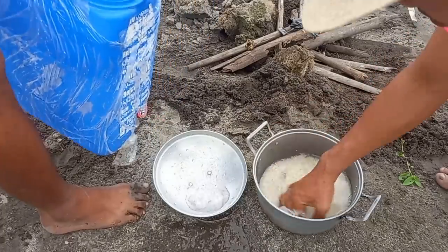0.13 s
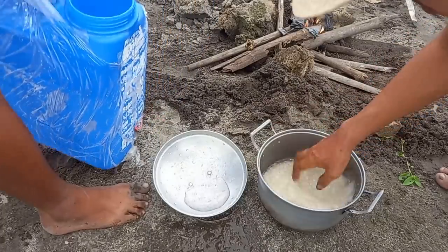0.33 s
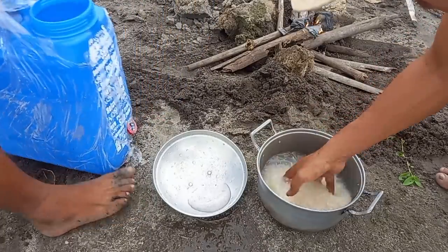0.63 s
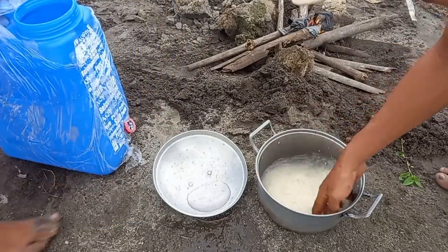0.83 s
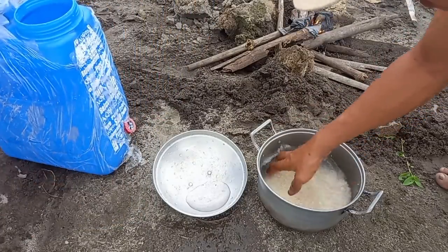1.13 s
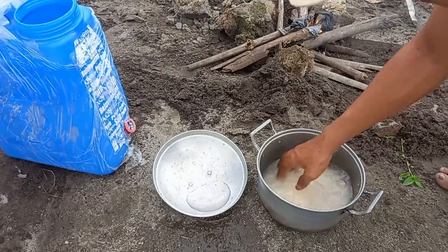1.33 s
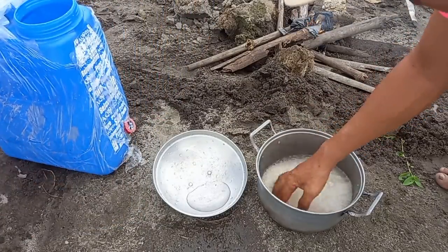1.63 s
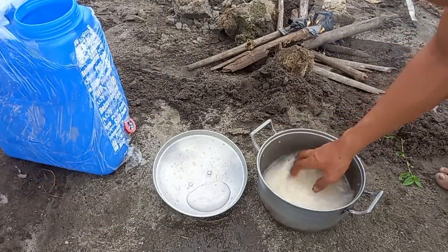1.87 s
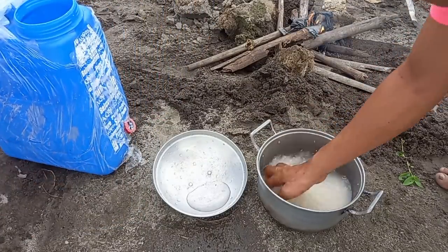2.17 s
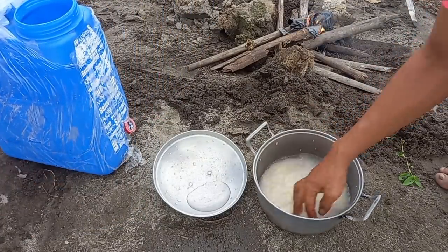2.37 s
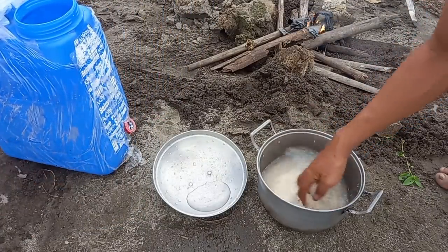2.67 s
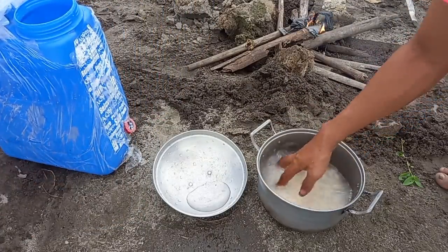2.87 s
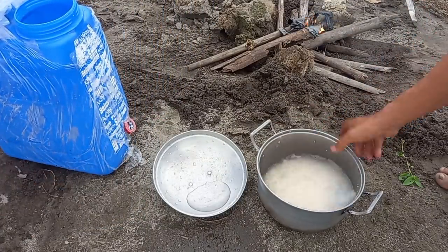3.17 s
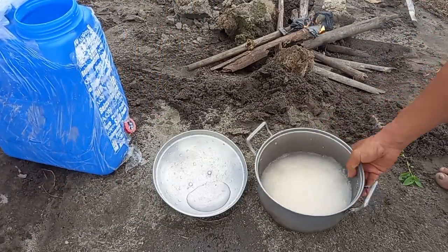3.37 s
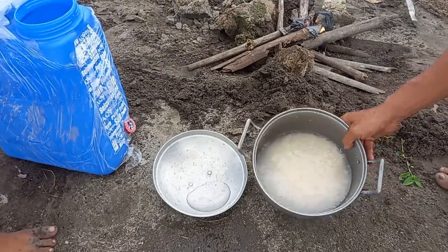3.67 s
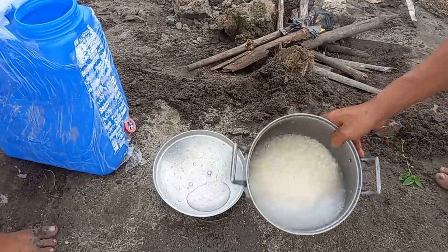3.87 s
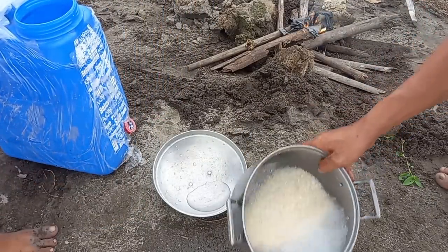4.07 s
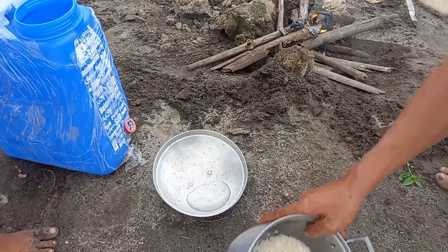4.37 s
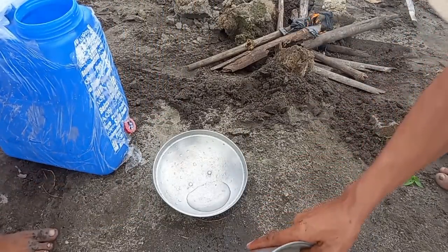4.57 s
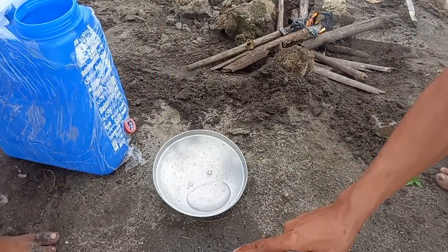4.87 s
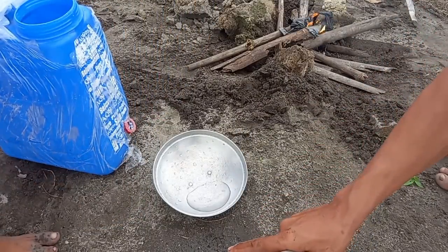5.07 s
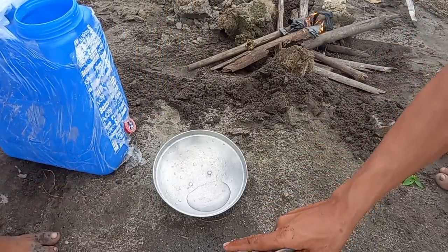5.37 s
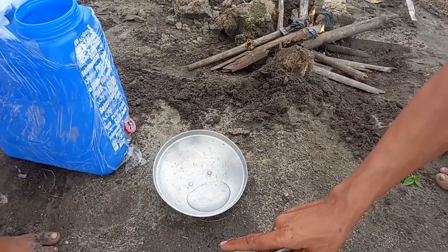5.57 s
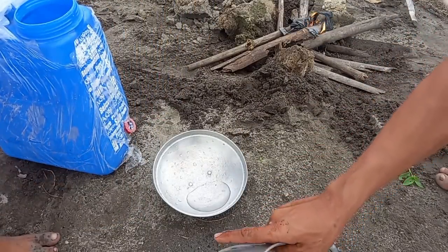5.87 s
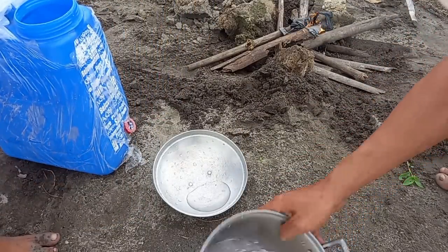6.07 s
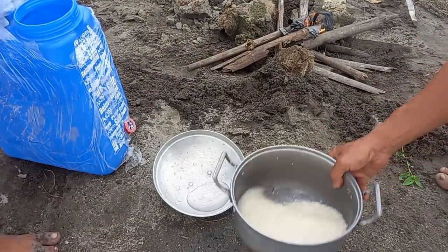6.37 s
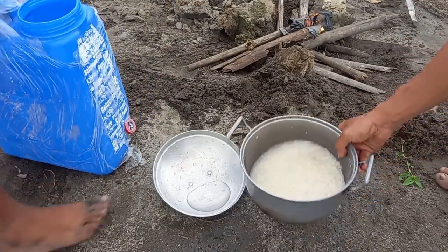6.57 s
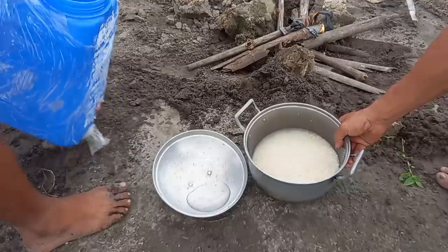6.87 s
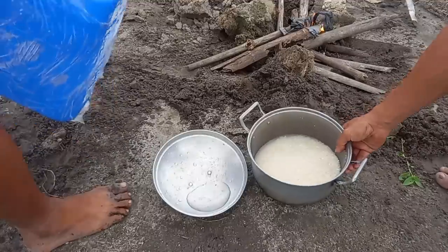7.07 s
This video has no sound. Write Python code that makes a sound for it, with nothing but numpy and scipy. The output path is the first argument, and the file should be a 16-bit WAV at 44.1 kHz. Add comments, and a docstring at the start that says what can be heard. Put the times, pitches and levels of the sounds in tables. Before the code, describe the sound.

Wet rice rasps and swishes under a stirring hand in a metal pot, the handle clacks, water splatters on the ground, then rice slides back.

```python
"""Outdoors, close to an aluminium pot: a hand swirls raw rice in water, then tips the pot by its loose handle.
Rice and falling water are showers of short noise ticks; splashes are swarms of ringing bubbles over noise.
Water spills on the ground, then the wet rice slides back; the handle clacks and dull knocks come in between.
Behind it a low noise throbs, with a faint, high, fast-pulsing tone.
The two microphone ports lie a few centimetres apart, so sounds reach them at slightly different times."""
import sys
import numpy as np
from scipy import signal
from scipy.io import wavfile
from scipy.ndimage import uniform_filter1d

SR = 44100
rng = np.random.default_rng(int(sys.argv[2]) if len(sys.argv) > 2 else 0)


def transcribe(signal):
    """Save signal, clipped to [-1, 1], as a 16-bit WAV file at the path in sys.argv[1]."""
    frames = np.atleast_2d(signal).T
    limited = np.clip(frames, -1, 1)
    pcm = np.round(limited * 32767).astype(np.int16)
    wavfile.write(sys.argv[1], SR, pcm)


N = 317690
TIME = np.arange(N) / SR
EDGE_HZ = 15800  # top of the band, and of the grain pitches
# Colour of water splashing inside the pot: (frequency [Hz], relative level per Hz [dB])
POT_SPLASH_COLOUR = [(400, -17), (1200, -7.5), (3000, -6.5), (9000, -26.5)]


def amp(db):
    """Decibels to a linear gain."""
    return 10 ** (np.asarray(db) / 20)


def unit(x):
    """Scales a sound to an RMS of one."""
    return x / np.sqrt(np.mean(x ** 2) + 1e-20)


def pan(db):
    """Gains of the two ports for a left minus right difference."""
    return amp(np.array([[db], [-db]]) / 2)


def together(gains):
    """Unrelated sounds add in power."""
    return np.sqrt(np.sum(np.square(gains), axis=0))


def add(mix, start_s, sound):
    """Lays a sound into the mix at its start time, cut off at the end."""
    part = mix[:, round(start_s * SR):][:, :sound.shape[1]]
    part += sound[:, :part.shape[1]]


def swell(start, rise, length, fall):
    """The gain of one movement: it builds up and, once its length is over, dies away; all in seconds."""
    age = np.maximum(TIME - start, 0)
    return (1 - np.exp(-age / rise)) * np.exp(-np.maximum(age - length, 0) / fall)


def wander(per_s):
    """Random values, per_s of them a second, joined by straight lines."""
    knots = rng.standard_normal(4000)
    return np.interp(TIME * per_s, np.arange(len(knots)), knots)


def colour(x, points):
    """Causal minimum-phase filter with the given spectrum, so that clicks keep their sharp fronts."""
    points_hz, points_db = np.transpose(points)
    hz = np.abs(np.fft.fftfreq(4096, 1 / SR))
    log_gain = np.log(amp(np.interp(np.log(hz + 1), np.log(points_hz), points_db)))
    response = np.exp(np.conj(signal.hilbert(log_gain)))
    taps = np.fft.ifft(response).real[:len(hz) // 2]
    return signal.oaconvolve(x, taps[None] / np.linalg.norm(taps), axes=1)[:, :x.shape[1]]


def ports(x, lag, wet):
    """Sound reaches the left port lag samples late (right if negative); the pot walls add short scattered echoes."""
    t = np.arange(0, .012, 1 / SR)
    echoes = rng.standard_normal((2, len(t))) * np.exp(-t / .004)
    paths = wet * echoes / np.linalg.norm(echoes, axis=1, keepdims=True)
    paths[0, max(round(lag), 0)] += 1
    paths[1, max(-round(lag), 0)] += 1
    return signal.fftconvolve(x[None], paths, axes=1) / np.sqrt(1 + wet ** 2)


def shower(shapes, drive, per_s, spread_db):
    """Plays the shapes at random moments while the drive lasts, their sizes spread exponentially in dB."""
    when, which, chance = rng.random((60000, 3))[:int(per_s * N / SR)].T
    size = amp(spread_db * np.minimum(-np.log(1 - chance), 4))
    moving = drive[(when * N).astype(int)] > drive.max() / 100
    out = np.zeros((2, N))
    for s, k, gain in zip(when[moving] * N / SR, which[moving] * len(shapes), size[moving]):
        add(out, s, gain * shapes[int(k)])
    # level set as if the shower never paused
    power = np.sum(size ** 2) * np.mean(np.square(shapes)) * shapes[0].shape[1] / N
    return out / np.sqrt(power)


def grain(hz, fall):
    """A tiny wet tick: a narrow burst of noise that swells and dies within milliseconds."""
    t = np.arange(0, .008, 1 / SR)
    noise = signal.lfilter(*signal.iirpeak(hz, 4.0, fs=SR), rng.standard_normal(len(t)))
    return unit(noise * t * np.exp(-t / fall))


def patter(drive, spectrum, per_s, spread_db, fall, hiss, clump_db, lag, wet, pan_db, count=120):
    """Wet grains or drops tick in clumps over the fine hiss of the moving mass; the pot scatters the wet share."""
    pitches = np.linspace(1500, EDGE_HZ, count)
    shapes = [ports(grain(hz, fall), lag + rng.normal() / 2, wet) for hz in pitches]
    direct = ports(rng.standard_normal(N), lag, 0)[:, :N]
    fine = unit(direct + 2 * wet * rng.standard_normal((2, N)))
    ticks = shower(shapes, drive, per_s, spread_db) + hiss * fine
    clumps = unit(amp(clump_db * wander(60)))
    return pan(pan_db) * drive * clumps * colour(ticks, spectrum) / np.hypot(1, hiss)


def bubble(hz, cycles, rise):
    """A ringing air pocket whose pitch glides as its depth changes."""
    age = np.arange(3000) / SR * hz / cycles  # in decay times
    turns = cycles * (age + rise * age * (age / 2 - .7))
    return (1 - np.exp(-age * 7)) * np.exp(-age) * np.sin(2 * np.pi * turns)


def froth(drive, low_hz, high_hz, per_s, spread_db, cycles, lag, count=48):
    """A swarm of bubbles of many sizes, each size with its own glide."""
    shapes = []
    for hz in np.geomspace(low_hz, high_hz, count):
        rise = 0.035 * rng.uniform(-1.2, 1.94)
        shapes.append(ports(unit(bubble(hz, cycles, rise)), lag, 1.0))
    return shower(shapes, drive, per_s, spread_db)


def splash(drive, spectrum, low_hz, high_hz, breaking_db, per_s, spread_db, cycles, wash, lag):
    """Gently moved water only swishes; as it is driven harder the surface breaks and bubbles take over."""
    broken = drive / (drive + amp(breaking_db))
    bubbles = broken * froth(drive, low_hz, high_hz, per_s, spread_db, cycles, lag)
    swish = wash * rng.standard_normal((2, N))
    return drive * colour(bubbles + swish, spectrum) / np.hypot(broken, wash)


def rumble():
    """A low noise that throbs about ten times a second, like a far idling engine."""
    # Throb rate: (time [s], rate [per second])
    throb_rates = [(0, 10.5), (4.8, 10.5), (5, 11.1), (6, 10.9), (6.4, 10.1)]
    # Rumble colour: (frequency [Hz], relative level per Hz [dB])
    rumble_colour = [(33, -46), (50, -19), (70, -2.5), (97, 3.5), (175, -9), (235, -11.5), (330, -20),
                     (900, -46)]
    turns = np.cumsum(np.interp(TIME, *np.transpose(throb_rates))) / SR + .45
    throb = amp(2.3 * np.cos(2 * np.pi * turns) + np.cos(4 * np.pi * turns))
    # one noise common to both ports, and a weaker one for each
    source = rng.standard_normal(N) + 0.5 * rng.standard_normal((2, N))
    noise = unit(colour(source, rumble_colour))
    steady = noise / np.sqrt(uniform_filter1d((noise ** 2).mean(0), size=6000))
    return amp(-21.5) * unit(steady * throb) * pan(db=-0.5)


def high_tone():
    """A faint, high, fast-pulsing tone of uneven strength that holds and then fades away."""
    pitch_hz, pulses_per_s = 8490, 21.14
    level_db, steady_s, fade_s = -45, 4.9, 1.4
    pulses = np.sin(np.pi * pulses_per_s * TIME) ** 4
    tone = np.sin(2 * np.pi * np.cumsum(pitch_hz + 60 * wander(600)) / SR)
    fade = np.exp(-np.maximum(TIME - steady_s, 0) / fade_s)
    return amp(level_db + 2 * wander(22)) * fade * pulses * tone


def dips():
    """The gain of rumble and high tone, which now and then drops and recovers."""
    # Dips: (time [s], depth [dB], hold [s], recovery time [s])
    dip_list = [(0.0, 9.5, 0.51, 0.41), (1.516, 10.5, 0.05, 0.68), (3.31, 2.5, 0.23, 0.051),
                (3.499, 14.5, 0.035, 0.41), (5.965, 3.5, 0.37, 0.044), (6.24, 8.5, .05, 0.78)]
    onset_s = 0.022
    return amp(-sum(depth_db * swell(s, onset_s, hold, recovery) for s, depth_db, hold, recovery in dip_list))


def air():
    """The faint outdoor hiss: noise that is mostly separate at the two ports and flutters slightly."""
    # Hiss colour: (frequency [Hz], relative level per Hz [dB])
    air_colour = [(500, 4), (1000, -3.5), (2000, -6), (3200, -4.5), (5500, -11.5), (11500, -16.5),
                  (15000, -9.5)]
    noise = 0.33 * rng.standard_normal(N) + rng.standard_normal((2, N))
    return amp(-39.0) * unit(colour(noise, air_colour) * amp(0.35 * wander(25)))


def knocks():
    """Dull knocks and bumps: one heavily damped swing and a dry tick."""
    # Knocks: (time [s], swing level [dB], pitch [Hz], swell time [s], fall time [s],
    # level of the dry tick [dB], left minus right of the swing [dB])
    knock_list = [(3.970, 2, 1680, 0.000041, 0.00031, -23.5, 2.5),
                  (3.9741, -6.5, 2000, 0.00014, 0.00031, -28, 7), (4.2906, -2.5, 227, 0.0016, 0.01, -21, 2),
                  (0.64, -17.5, 130, 0.011, 0.042, -60, 0), (4.923, -3, 87.4, 0.015, 0.017, -60, -19.5)]
    out, t = np.zeros((2, N)), np.arange(9000) / SR
    for s, db, hz, rise, fall, tick_db, pan_db in knock_list:
        envelope = (1 - np.exp(-t / rise)) ** 2 * np.exp(-np.maximum(t - rise, 0) / fall)
        swing = -np.sin(2 * np.pi * hz * t) * envelope
        tick = ports(rng.standard_normal(len(t)) * np.exp(-t / 0.011), 0, 0.68)
        add(out, s, amp(db) * pan(pan_db) * swing)
        add(out, s, amp(tick_db) * colour(tick, [(450, 2.5), (2300, -4), (10000, -21.0)]))
    return out


def handle():
    """The loose handle scrapes in its lugs and stops; the wet load damps the metal at once."""
    # Clacks: (time [s], level [dB], length of the scrape [s], fall time [s],
    # lag of the left port [samples], brightness [dB per octave])
    clacks = [(3.311, -11, 0.0008, 0.0017, 1, 7), (3.5, -13.5, 0.0023, 0.0082, 1, 1.5),
              (3.538, -4.5, 0.00086, 0.0024, 4, 2), (6.25, -6, 0.0091, 0.00093, 2, 0),
              (6.2742, -6, 0.001, 0.0011, -0.5, 1.5), (7.091, -8.5, 0.0019, 0.0018, -2, -0.5)]
    # Colour of the metal before the brightness tilt: (frequency [Hz], relative level per Hz [dB])
    metal_colour = [(150, -19), (450, 0.5), (900, -6), (1500, -2), (3000, 0), (5200, -0.5), (7200, -1),
                    (9500, -9.5), (15000, -8.5)]
    out, t = np.zeros((2, N)), np.arange(4000) / SR
    for s, db, scrape, fall, lag, tilt_db in clacks:
        envelope = np.sqrt(np.minimum(t / scrape, 1)) * np.exp(-np.maximum(t - scrape, 0) / fall)
        chatter = rng.standard_normal(len(t)) * envelope
        metal = [(hz, band_db + tilt_db * np.log2(hz)) for hz, band_db in metal_colour]
        add(out, s, amp(db) * colour(ports(chatter, lag, 0.93), metal))
    return out


def smacks():
    """Wet smacks and drips: a film of water snaps in a very short, broad burst."""
    # Smacks: (time [s], level [dB], centre frequency [Hz])
    smack_list = [(0.146, -7, 10500), (0.325, -7, 2000), (0.954, -5.5, 2300), (1.479, -8.5, 4100),
                  (1.508, -3.5, 7200), (1.522, -4, 4500), (1.552, -7, 3020), (2.483, -10, 1700),
                  (3.12, -12, 2900), (3.681, -13.5, 3400), (4.154, -11.5, 13200), (5.142, -7.5, 5900),
                  (5.719, -4.5, 11700), (6.106, -7, 1600)]
    out, t = np.zeros((2, N)), np.arange(2000) / SR
    for s, db, hz in smack_list:
        snap = rng.standard_normal(len(t)) * np.sqrt(t / 0.00028) * np.exp(-t / 0.00046)
        burst = ports(snap, 2, 0.98)
        add(out, s, amp(db) * colour(burst, [(hz / 8, -24), (hz, 0), (hz * 2.4, -12)]))
    return out


def plops():
    """Each single bubble glides upward by its own share as it surfaces, in a short splash of the water that traps it."""
    # Air pockets that close behind the fingers or under falling drops: (time [s], pitch [Hz], level [dB])
    bubbles = [(.145, 2270, -16), (0.259, 1620, -14), (.298, 1500, -15), (0.325, 1304, -16.5),
               (0.329, 2570, -13.5), (.537, 1110, -15.5), (0.538, 1800, -15.5), (0.6, 1334, -20),
               (0.654, 1455, -17.5), (.705, 780, -18), (0.713, 2980, -13), (0.73, 1154, -12.5),
               (.817, 3300, -13), (1.1, 669, -19), (1.114, 1303, -13), (1.353, 2280, -18.5),
               (1.48, 4100, -11), (1.533, 1323, -11.5), (1.668, 1580, -21), (2.012, 2410, -11),
               (2.202, 1360, -13.5), (2.205, 2460, -10.5), (2.255, 2260, -10.5), (2.274, 1560, -7.5),
               (2.336, 1866, -21), (2.482, 2800, -16.5), (2.691, 1176, -12.5), (2.702, 1680, -9),
               (2.815, 1230, -21.5), (4.769, 6670, -4), (5.95, 3100, -9.5), (6.146, 3130, -15.5)]
    splash_s, splash_db = 0.0093, -12.5  # level relative to the bubble
    out, t = np.zeros((2, N)), np.arange(3000) / SR
    age = t / splash_s
    for s, hz, db in bubbles:
        ring = bubble(hz, cycles=8, rise=rng.uniform(0, 0.06))
        add(out, s, amp(db) * ports(ring, 2, 0.59))
        spray = unit(signal.lfilter(*signal.iirpeak(hz, 2, fs=SR), rng.standard_normal((2, len(t)))))
        add(out, s, amp(db + splash_db) * spray * np.sqrt(age) * np.exp(-age))
    return out


def gurgles():
    """Churning water keeps an air cavity ringing; its pitch glides, mostly down, as the water reshapes it."""
    # Gurgles: (time [s], length [s], first pitch [Hz], last pitch [Hz], level [dB])
    gurgle_list = [(0.561, 0.039, 1450, 844, -29.5), (0.628, 0.29, 666, 571, -36),
                   (0.675, 0.13, 1068, 1020, -39), (1.709, 0.047, 1278, 967, -33),
                   (2.982, 0.3, 402.2, 300, -37.5), (5.754, 0.052, 498, 545, -33.5),
                   (6.019, 0.15, 1252, 1152, -38.5)]
    width_hz = 45
    out = np.zeros((2, N))
    for s, length, first_hz, last_hz, db in gurgle_list:
        u = np.linspace(0, 1, round(length * SR))
        noise = [1, 1j] @ rng.standard_normal((2, SR))
        churn = signal.lfilter([1], [1, -np.exp(-np.pi * width_hz / SR)], noise)[-len(u):]
        turns = np.cumsum(first_hz + (last_hz - first_hz) * u) / SR
        ring = (churn * np.exp(2j * np.pi * turns)).real
        add(out, s, amp(db) * ports(unit(ring * np.sin(np.pi * np.sqrt(u))), 2, 0.51))
    return out


def slosh():
    """Water surges against the wall, and each surge folds large, dull air pockets into it."""
    # Surges: (time of the crest [s], level [dB], half length [s])
    surges = [(0.673, -42, 0.033), (0.813, -47, 0.065), (2.76, -49, 0.15), (3.09, -47.5, 0.13),
              (6.111, -36, 0.0059), (6.772, -38, 0.032)]
    # Slosh colour: (frequency [Hz], relative level per Hz [dB])
    slosh_colour = [(170, 6), (330, 2.5), (620, 4), (1000, -4), (3500, -29)]
    surge = sum(amp(db) * np.exp(-((TIME - s) / half) ** 2 / 2) for s, db, half in surges)
    pockets = froth(surge, 180.0, 1404, per_s=2500, spread_db=0.82, cycles=2.55, lag=0)
    return surge * colour(pockets, slosh_colour)


def pouring():
    """Rinse water patters and splashes on the ground: two gushes over the rim, then a stream that swells and stops."""
    # Gushes: (start [s], rise time [s], length [s], patter level [dB])
    gushes = [(4.524, 0.014, 0.026, -31), (4.641, 0.083, 0.15, -25.5)]
    # Stream: (time [s], patter level [dB])
    stream_levels = [(4.9, -39.5), (5.104, -37.5), (5.47, -40), (5.582, -33), (5.9, -30), (5.96, -25),
                     (6.24, -27.5)]
    # Colours of the patter and the splash on the ground: (frequency [Hz], relative level per Hz [dB])
    draining_colour = [(700, -41), (2000, -17), (3200, 0.5), (5000, 7.5), (7000, 8), (9200, -1),
                       (12000, 7.5), (15000, 1)]
    ground_colour = [(500, -7.5), (780, -14), (1160, -11.5), (1550, -17.5), (2150, -8.5), (3150, -4.5),
                     (3900, -8.5), (9000, -11.5)]
    gush_fall_s, stream_fall_s = 0.061, 0.033
    gush_splash_db, stream_splash_db = -8, -3  # relative to the patter
    gush = together([amp(db) * swell(s, rise, length, gush_fall_s) for s, rise, length, db in gushes])
    s, flow_db = np.transpose(stream_levels)
    running = np.exp(-abs(TIME - np.clip(TIME, s[0], s[-1])) / stream_fall_s)
    stream = running * amp(np.interp(TIME, s, flow_db))
    drops = together([gush, stream])
    water = together([amp(gush_splash_db) * gush, amp(stream_splash_db) * stream])
    draining = patter(drops, draining_colour, per_s=550, spread_db=4.2, fall=0.0004, hiss=0.45,
                      clump_db=1.0, lag=4.8, wet=0.5, pan_db=-3.0)
    trickle = splash(water, ground_colour, low_hz=1094, high_hz=5430, breaking_db=-32.5, per_s=1200,
                     spread_db=3.5, cycles=4.1, wash=0.57, lag=3)
    return draining + trickle


def sliding():
    """Wet rice rasps along the wall when the water swings or the pot tilts; the water follows it."""
    # Slides: (start [s], rise time [s], length [s], fall time [s], rasp level [dB])
    slides = [(1.015, 0.17, 0.26, 0.063, -22.5), (3.09, 0.051, 0.2, 0.057, -42),
              (3.419, 0.089, 0.091, 0.031, -29), (3.655, 0.01, 0.033, 0.012, -33.5),
              (3.693, 0.038, 0.14, 0.05, -37.5), (6.323, 0.018, 0.095, .03, -40.5),
              (6.436, 0.02, 0.19, 0.18, -23.5), (6.897, 0.062, 0.18, 0.041, -31.5),
              (7.099, 0.017, 0.04, 0.072, -23.5)]
    # Rasp colour: (frequency [Hz], relative level per Hz [dB])
    sliding_colour = [(700, 0), (2000, -11), (3000, -1.5), (4500, -1), (5800, -1.5), (7200, 1),
                      (9200, -7.5), (12000, -2), (15000, -5)]
    splash_db = -13.5  # relative to the rasp
    rasp = together([amp(db) * swell(s, rise, length, fall) for s, rise, length, fall, db in slides])
    grains = patter(rasp, sliding_colour, per_s=3000, spread_db=-2.0, fall=0.00023, hiss=0.99,
                    clump_db=2.0, lag=-11, wet=0.81, pan_db=2.5)
    backwash = splash(amp(splash_db) * rasp, POT_SPLASH_COLOUR, low_hz=710, high_hz=4080, breaking_db=-65,
                      per_s=1500, spread_db=2.0, cycles=2.2, wash=0.97, lag=-13.5)
    return grains + backwash


def stirring():
    """Fingers dig into the rice and sweep round the pot: grains rasp, water splashes and settles first."""
    # Plunges of the fingers: (start [s], rasp level [dB], fall time [s])
    plunges = [(0.0, -24.5, 0.045), (0.518, -23.5, 0.074), (1.494, -27, 0.034), (2.006, -23.5, 0.029),
               (2.61, -27.5, 0.17)]
    # Sweeps between them: (start [s], length [s], rasp level [dB], splash level [dB])
    sweeps = [(0.01, 0.2, -31, -40.5), (0.25, 0.084, -32, -38.5), (0.58, 0.33, -30.5, -37.5),
              (0.904, 0.25, -29, -45.5), (1.634, 0.056, -33, -36.5), (1.775, 0.32, -34, -45),
              (2.164, 0.12, -32, -35), (2.378, 0.5, -35.5, -44.5), (2.817, 0.31, -36, -37)]
    # Rasp colour: (frequency [Hz], relative level per Hz [dB])
    rubbed_colour = [(700, -8.5), (2000, -3.5), (3200, 3.5), (5000, 3), (7200, 5), (9200, -1.5),
                     (12000, 1.5), (15000, -1.5)]
    plunge_rise_s, plunge_length_s = 0.0021, 0.049
    plunge_splash_db = -13.5  # relative to the rasp
    sweep_rise_s, rasp_fall_s, water_fall_s = 0.018, 0.22, 0.17
    dig = together([amp(db) * swell(s, plunge_rise_s, plunge_length_s, fall) for s, db, fall in plunges])
    rasp = together([amp(db) * swell(s, sweep_rise_s, length, rasp_fall_s) for s, length, db, _ in sweeps])
    wake = together([amp(db) * swell(s, sweep_rise_s, length, water_fall_s) for s, length, _, db in sweeps])
    hand = together([dig, rasp])
    water = together([amp(plunge_splash_db) * dig, wake])
    rubbed = patter(hand, rubbed_colour, per_s=1600, spread_db=4.5, fall=0.00035, hiss=0.9,
                    clump_db=1.7, lag=2.2, wet=0.9, pan_db=-0.5)
    swirl = splash(water, POT_SPLASH_COLOUR, low_hz=754, high_hz=4170, breaking_db=-34.5, per_s=800,
                   spread_db=2.6, cycles=6.5, wash=0.72, lag=2)
    return rubbed + swirl


def scene():
    """The background, the pot's metal, single water sounds, then the pouring, sliding and stirring."""
    background = dips() * (rumble() + high_tone()) + air()
    metal = knocks() + handle()
    water = smacks() + plops() + gurgles() + slosh()
    return background + metal + water + pouring() + sliding() + stirring()


def record(dry):
    """The right port hears more treble than the left; then the full-scale limit and the band edge."""
    low = signal.oaconvolve(dry, signal.firwin(21, 7000, fs=SR)[None], "same", axes=1)
    treble = dry - low
    heard = dry + (pan(db=-2.5) - 1) * treble
    edge = signal.firwin(301, EDGE_HZ, window=("kaiser", 9), fs=SR)
    return signal.oaconvolve(np.clip(heard, -1, 1), edge[None], "same", axes=1)


dry = scene()
out = record(dry)
transcribe(out)
```